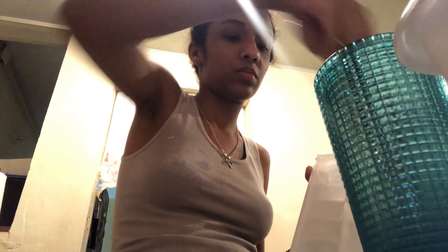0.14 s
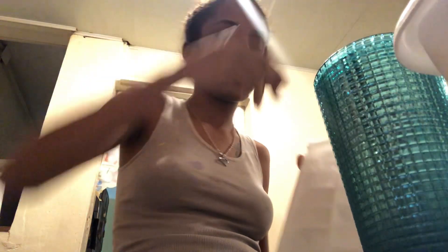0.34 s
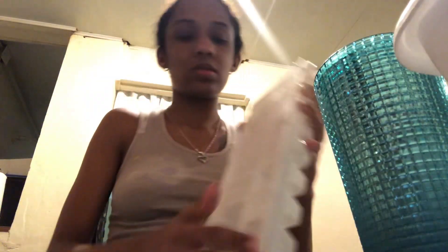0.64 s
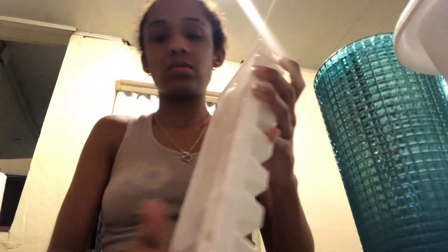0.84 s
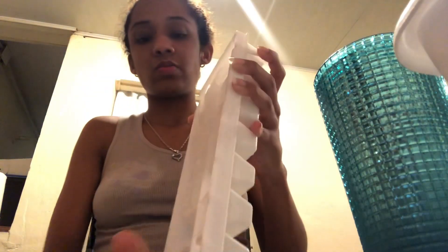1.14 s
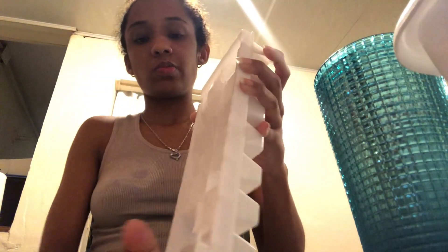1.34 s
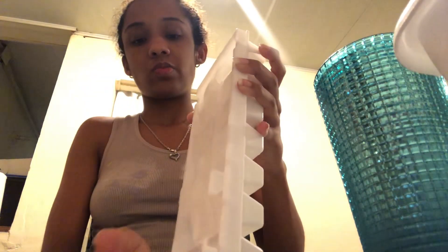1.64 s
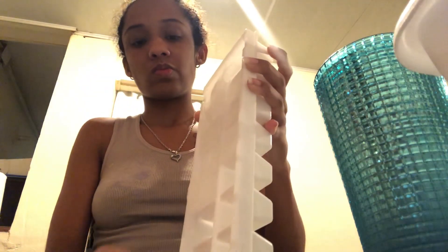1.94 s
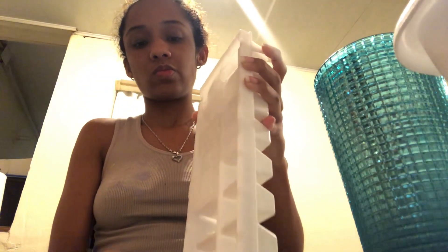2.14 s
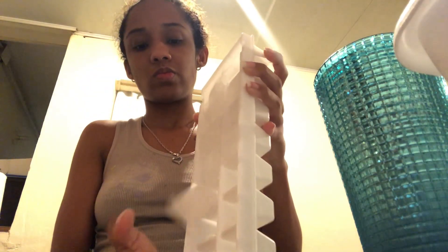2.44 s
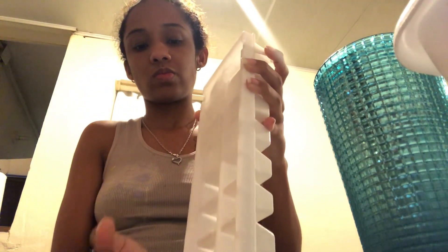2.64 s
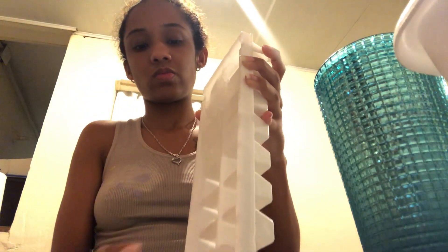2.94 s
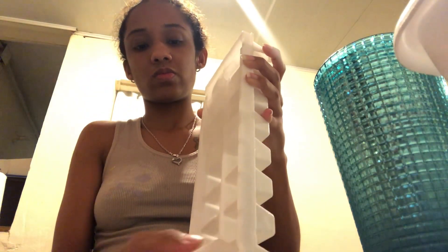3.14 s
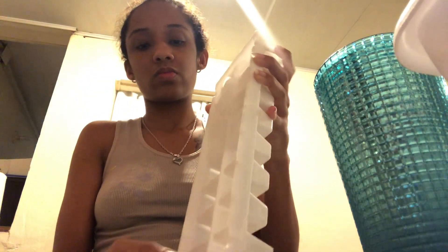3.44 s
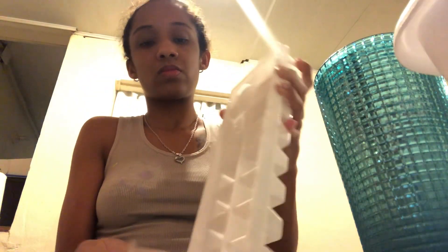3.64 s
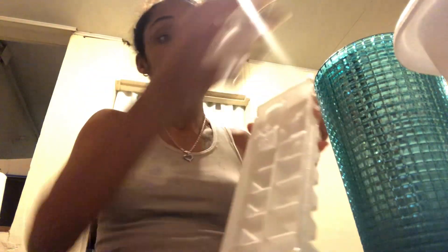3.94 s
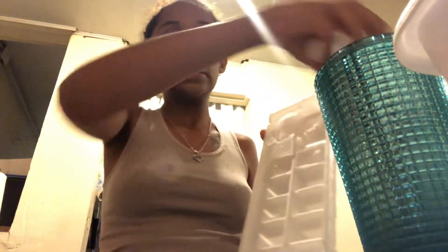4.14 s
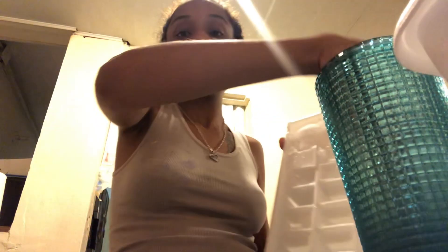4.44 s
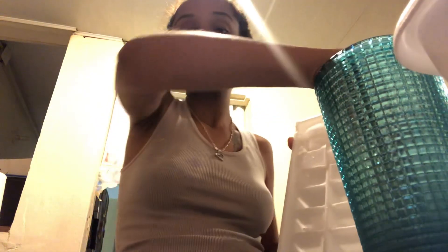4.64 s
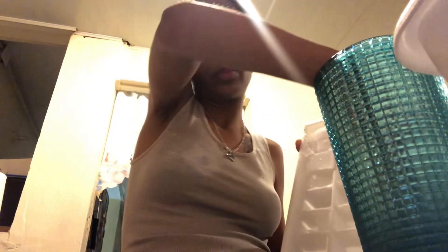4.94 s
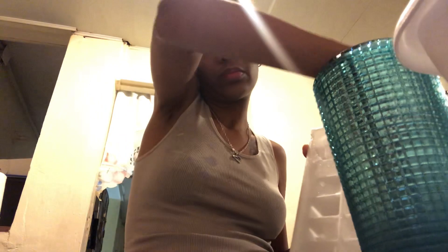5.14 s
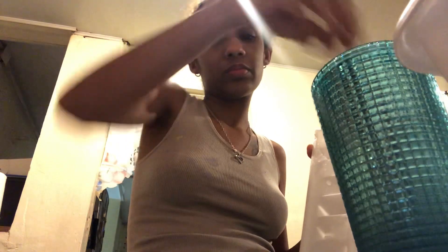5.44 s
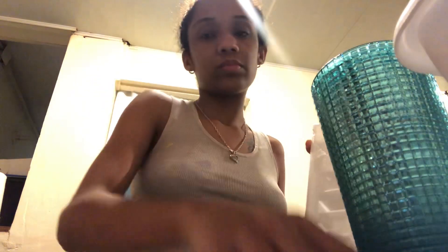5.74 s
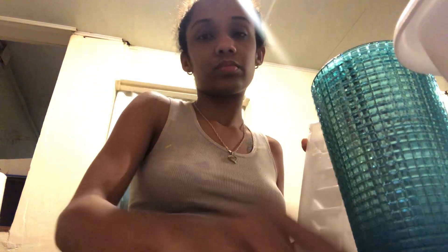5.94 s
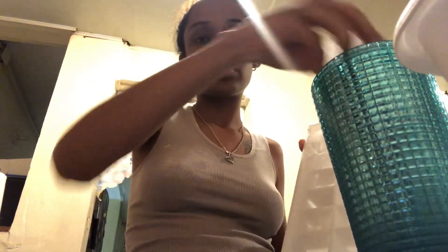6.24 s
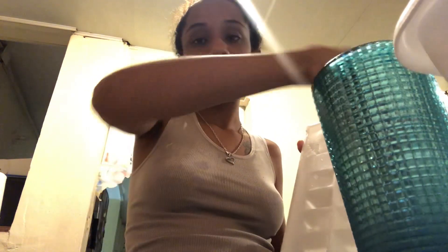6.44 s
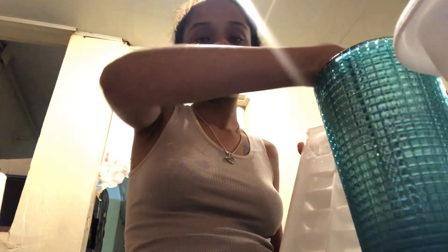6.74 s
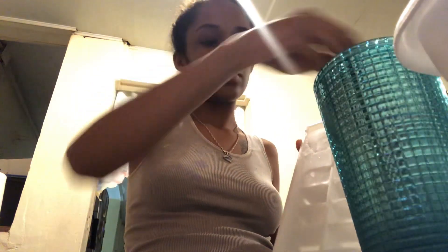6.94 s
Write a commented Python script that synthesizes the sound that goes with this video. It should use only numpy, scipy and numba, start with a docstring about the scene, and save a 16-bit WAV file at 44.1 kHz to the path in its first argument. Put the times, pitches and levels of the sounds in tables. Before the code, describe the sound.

In a small kitchen with a faint appliance hum, ice ticks and cracks in a twisted plastic tray while fingers rub against it. After a sharp snap, a few cubes clatter onto the counter. More hollow knocks and brief rattles follow as cubes drop into a plastic cup, pause, and drop again. The close microphone rests on the counter and picks up dull thumps, with a short room tail.

```python
"""A plastic ice tray, flexed and rubbed by hand in a small kitchen: ice cracks and cubes snap loose.
Cubes drop on the counter, then knock and rattle in a plastic jug. Each hit is a noise burst ringing
the tray, counter or jug; rubs and rattles are dense stick-slip clicks. The microphone lies on the
counter, so blows also reach it through the slab as thumps that fall in pitch.
The walls add a short tail, and a quiet appliance hum sits behind it all."""
import sys
import numpy as np
from scipy import signal
from scipy.fft import rfft, irfft
from scipy.io import wavfile
from scipy.ndimage import uniform_filter1d
from numba import njit

SR = 44100
rng = np.random.default_rng(int(sys.argv[2]) if len(sys.argv) > 2 else 0)


def pcm_store(signal):
    """Save signal as 16-bit PCM."""
    levels = np.round(np.clip(np.atleast_2d(signal), -1, 1) * 32767)
    wavfile.write(sys.argv[1], SR, levels.astype(np.int16).T)


N = 312669

# spectrum of the room tone: f/Hz, relative density/dB
ROOM_TONE = [(15, -45.5), (25, -28), (64, -4), (145, -6), (180, -4.5), (212, -9), (242, -7), (309, -5.5),
             (641, -9), (734, -8), (1290, -18), (3430, -24.5), (5000, -24.5), (16000, -38.5)]
# bands of the wall reflections: f/Hz, t60/s, relative level/dB
WALL_BANDS = [(182, 0.66, -15), (398, 0.28, -12.5), (830, 0.55, -12), (1904, 0.29, -16),
              (4385, 0.49, -17.5), (10540, 0.087, -19)]
# blows carried through the counter: t/s, thump peak/dB, slab note level/dB
SLAB_BLOWS = [(0.846, -48.5, -68), (1.265, -50, -77), (1.738, -49.5, -83), (2.516, -58, -61),
              (3.229, -65, -60), (3.386, -23, -34), (3.484, -31.5, -49), (3.588, -25.5, -34),
              (3.759, -67.5, -53.5), (4.167, -55, -58), (4.242, -49.5, -53), (4.313, -39.5, -40.5),
              (4.4, -49.5, -46.5), (4.552, -44.5, -58), (4.64, -48.5, -58.5), (4.727, -55.5, -56),
              (4.811, -31.5, -39.5), (4.906, -41.5, -36.5), (5.03, -66, -54), (5.13, -41.5, -47),
              (5.169, -44, -58.5), (5.192, -40, -52), (5.289, -40, -51), (5.363, -29, -37),
              (5.389, -38, -26), (5.488, -33.5, -36), (5.585, -53.5, -47.5), (5.784, -46.5, -53),
              (5.862, -59.5, -50), (6.41, -64, -58.5), (6.459, -40.5, -46), (6.497, -35.5, -39.5),
              (6.519, -45.5, -41), (6.675, -25, -29), (6.732, -29, -40), (6.795, -34, -36)]

# resonances of the jug, counter and tray: f/Hz, width/Hz, gain/dB
JUG_MODES = [(267.5, 53, 1.5), (404, 59, 4.5), (508, 88, 2), (596, 135, -6), (724, 106, 0.5),
             (815, 305, -5), (1240, 1400, -2), (1670, 640, 8), (2250, 133, 6.5), (2550, 540, 8.5),
             (3340, 31, -23), (4630, 210, -5), (4920, 140, 2.5)]
COUNTER_MODES = [(273, 140, -6), (460, 130, 1), (567.6, 173, -1.5), (760, 190, -2), (964, 200, -5.5),
                 (1190, 100, -10), (1430, 680, 10), (2300, 220, 7), (3035, 130, -7.5), (4820, 800, -5)]
TRAY_MODES = [(308.3, 140, -5.5), (470, 99, 1), (850, 200, -4), (1368, 98, 1), (1880, 300, -4.5),
              (2594, 240, -3), (3170, 170, -0.5), (4090, 460, -7), (5100, 180, -6.5), (5500, 1700, -13.5),
              (6900, 1300, -8.5), (7686, 330, -7), (11170, 410, -22.5)]

# cubes knocking in the jug, cubes landing on the counter, ice cracking in the tray:
# t/s, attack peak/dB, tick f/Hz, low-mode peak/dB, relative treble/dB, decay/ms
JUG_KNOCKS = [(4.2438, -56.5, 1620, -44, -26, 11.4), (4.3815, -53, 3920, -48.5, -11, 15),
              (4.4137, -54.5, 1600, -38.5, -23, 6.3), (4.5481, -54, 1603, -41.5, -23.5, 7.3),
              (4.6343, -41.5, 2160, -41, -21.5, 9.4), (4.7261, -34.5, 2040, -30.5, -26.5, 9.7),
              (4.8047, -23, 1835, -27.5, -30.5, 9.6), (4.9061, -31, 2330, -33, -15.5, 4),
              (4.9244, -32.5, 1680, -36.5, -22, 6.8), (5.1287, -48.5, 2320, -47, -21, 12),
              (5.1665, -52, 2010, -44, -17.5, 7.6), (5.1938, -47.5, 2000, -39.5, -19, 8.4),
              (5.2525, -51, 3320, -52, -21, 7.6), (5.3228, -48, 1710, -48, -18, 6.2),
              (5.3533, -35.5, 2100, -37, -2, 23), (5.3624, -23.5, 4050, -33, -12, 11.6),
              (5.3926, -24, 2190, -24, -17, 7.2), (5.4244, -31.5, 2070, -53, -26, 9.7),
              (5.4796, -31, 1704, -34, -27.5, 7.8), (5.4919, -32.5, 2020, -29.5, -25.5, 13.4),
              (5.5147, -34, 1880, -38, -25, 5.9), (5.5431, -37, 1925, -44, -28, 4.6),
              (5.5917, -60, 2090, -47, -22.5, 6.5), (5.7843, -52, 2540, -46.5, -28, 5.1),
              (6.4489, -62, 2520, -39, -6, 7.8), (6.4962, -26, 2160, -26.5, -23.5, 7.5),
              (6.5034, -23.5, 2120, -29, -23, 5.3), (6.6687, -30, 1530, -25.5, -27, 6),
              (6.7184, -33, 2360, -27.5, -7, 4.3), (6.7338, -20.5, 3000, -27.5, 3.5, 4.9),
              (6.7768, -36, 2360, -36, -14, 6.2), (6.795, -19, 2300, -22.5, -19, 5.9)]
COUNTER_DROPS = [(3.479, -28.5, 2580, -18.5, -6.5, 2.3), (3.5879, -5, 4960, -8.5, -28, 1.44),
                 (3.5972, -22, 3140, -14.5, -21.5, 6.6), (3.6192, -26, 3160, -18, -22, 2.4),
                 (3.6521, -23, 3290, -35, -8, 4.5)]
TRAY_CRACKS = [(0.5851, -57.5, 4300, -68, 0, 3), (0.6683, -42.5, 1900, -63, -20, 2.2),
               (0.756, -39.5, 3900, -64, -20, 3), (0.844, -26, 4560, -37, -4, 1.3),
               (1.0864, -43.5, 2740, -57, -6, 2.3), (1.1374, -39, 3780, -47, 3, 1.4),
               (1.2087, -35, 2580, -44.5, -16, 2.7), (1.2338, -31.5, 3970, -64, -10, 7.7),
               (1.26, -30.5, 6400, -33, -3, 2), (1.2845, -35, 4300, -68, -12, 2.7),
               (1.347, -34, 4380, -62, -21, 3), (1.3916, -37, 4900, -69, -3, 2.5),
               (1.4244, -36, 4130, -64, -15, 1.4), (1.4631, -24.5, 6300, -70, 3, 0.47),
               (1.4839, -40, 2630, -64, -6, 2.1), (1.5548, -32.5, 6130, -69, 0.5, 1.2),
               (1.5618, -35, 3130, -67, 11, 1.3), (1.575, -42.5, 1560, -71, -15, 2.8),
               (1.6435, -36.5, 2380, -46.5, -15, 1.7), (1.6623, -39, 2620, -70, -6, 5.9),
               (1.6866, -28.5, 2390, -68, 2, 2.2), (1.7164, -44, 2420, -67, -15, 1.7),
               (1.738, -21.5, 1350, -36.5, -5, 3.6), (1.856, -39, 1620, -53.5, -24, 2.1),
               (1.9034, -42.5, 4600, -52.5, -16, 3.7), (2.1984, -49.5, 4260, -68, -15, 2.1),
               (2.2436, -50, 3000, -50, -16, 4.1), (2.3072, -42, 4100, -51, 5.5, 1.3),
               (2.4378, -49, 2020, -60, -16.5, 3.4), (2.4954, -26, 2540, -42, -1, 3.4),
               (2.515, -4.5, 2400, -13.5, -19, 1.04), (2.5388, -20, 1830, -32, -9, 2.2),
               (2.546, -6, 1490, -59, -16, 1.9), (2.5704, -35, 1640, -54, -24, 2.5),
               (2.683, -41, 3220, -59, 0, 3.4), (2.8815, -39.5, 1510, -50, -5, 2.2),
               (2.9232, -40.5, 4080, -63, 11.5, 0.77), (2.9975, -42, 1710, -46.5, -18, 7.7),
               (3.1349, -46, 1790, -69, 9, 1.9), (3.1606, -39, 1780, -78, -17, 3.2),
               (3.2203, -41.5, 1850, -42, -21, 3.4), (3.3084, -38, 2320, -55, -23, 0.78),
               (3.3156, -18.5, 5600, -46, -16, 1.5), (3.7535, -36.5, 2450, -49, -6, 1.2),
               (3.7644, -45, 2570, -46, -4, 4.8), (3.8203, -41.5, 1380, -65, -10, 6.5),
               (3.8746, -48, 1980, -72, -30, 1.8), (3.9263, -49.5, 1360, -64.5, -11, 1.7),
               (3.9656, -53, 4780, -68, -11.5, 2.3), (4.0143, -50, 3220, -62.5, -9, 3.9),
               (4.164, -57, 2390, -53.5, -11.5, 3.1), (4.1856, -46.5, 4100, -52.5, -24.5, 1.5)]

# cubes settling in the jug, fingers and ice sliding on the tray:
# t/s, length/s, gain/dB, swell or fade/dB, relative treble/dB
JUG_RATTLES = [(4.243, 0.1, -66.5, 7.5, -31), (4.395, 0.023, -60, 7.5, -27), (4.82, 0.036, -45.5, -16, -19),
               (4.902, 0.043, -43, -10, -37), (5.13, 0.16, -49.5, -2.5, -27),
               (5.363, 0.27, -24.5, -34.5, -24.5), (5.786, 0.094, -57, 2.5, -25.5),
               (6.45, 0.046, -64.5, 4, -24.5), (6.502, 0.042, -29.5, -27.5, -22),
               (6.67, 0.045, -34.5, -6.5, -36), (6.735, 0.028, -26.5, -17, -16.5),
               (6.792, 0.16, -33.5, -33, -18.5)]
TRAY_RUBS = [(0.66, 0.073, -49.5, -5.5, -10.5), (0.748, .1, -54, 9.5, -14), (1.06, 0.081, -59.5, 2, -11),
             (1.134, 0.061, -54.5, -1.5, -14), (1.208, 0.081, -47.5, 4, -8),
             (1.342, 0.073, -47.5, 3.5, -8.5), (1.47, .07, -58.5, 3, -15), (1.56, 0.07, -57.5, -3.5, -11),
             (1.63, 0.094, -56.5, 2.5, -7.5), (1.854, 0.032, -49, -11.5, -13),
             (1.9, 0.026, -61, 12.5, -13.5), (2.2, 0.057, -62.5, 7.5, -5.5), (2.304, .04, -60.5, -3, -14),
             (2.37, 0.058, -56.5, 3, -7.5), (2.56, 0.06, -38.5, -18, -8.5), (2.66, 0.094, -57.5, 3, -13),
             (2.82, 0.12, -63.5, 5.5, -24), (2.97, 0.04, -49.5, -5, -15), (3.067, .035, -55, -6, -22),
             (3.124, 0.07, -49, -5.5, -20), (3.22, 0.04, -45, -6.5, -18.5), (3.325, 0.034, -51, 5, -12),
             (4.162, 0.04, -57, -11, -11)]


def undb(db):
    """Decibels to gain."""
    return 10 ** (np.asarray(db) / 20)


def at_rms(x, db):
    """Scale to an rms level."""
    return x * undb(db) / np.sqrt(np.mean(x ** 2))


def at_peak(x, db):
    """Scale to a peak level."""
    return x * undb(db) / np.max(np.abs(x))


def add(out, start_s, x):
    """Mix in a short sound at a given time."""
    i = int(start_s * SR)
    out[i:i + len(x)] += x[:N - i]


def wander(rate_hz):
    """Glide between random values; spread near 1."""
    hold = int(SR / rate_hz)
    steps = np.repeat(rng.standard_normal(N // hold + 1), hold)
    return uniform_filter1d(steps, hold)[:N]


@njit
def bandpass(x, hz, width_hz):
    """State-variable band-pass, gain 1 at the centre."""
    y, band, low = np.empty(len(x)), 0., 0.
    g, damping = np.tan(np.pi * hz / SR), width_hz / hz
    for i in range(len(x)):
        v = (band + g * (x[i] + 1e-18 - low)) / (1 + g * (g + damping))
        band, low = 2 * v - band, low + 2 * g * v
        y[i] = damping * v
    return y


def treble(x):
    """The broad top of a snap or scrape."""
    return bandpass(bandpass(x, 9000, 8000), 10500, 11000)


def room_tone(hum_db=-65.5, whine_db=-91.5):
    """Background of appliance hum and microphone hiss, wavering a little, with a faint high whine."""
    hz, db = np.transpose(ROOM_TONE)
    bins_hz = np.maximum(np.arange(N // 2 + 1) * SR / N, 1)
    spectrum = undb(np.interp(np.log(bins_hz), np.log(hz), db))
    hum = irfft(rfft(rng.standard_normal(N)) * spectrum, N)
    whine = bandpass(rng.standard_normal(N), hz=5010, width_hz=82)
    return at_rms(hum, hum_db) * undb(1.1 * wander(3.3)) + at_rms(whine, whine_db)


def wall_tail(direct, build_s=0.001):
    """Diffuse reflections off the near walls: each band dies at its own rate."""
    t = np.arange(int(SR * .6)) / SR
    tail, top_hz = 0, WALL_BANDS[-1][0]
    for hz, t60, db in WALL_BANDS:
        noise = rng.standard_normal(len(t))
        band = bandpass(bandpass(noise, hz, 1.2 * hz), hz, 1.2 * hz) * undb(-60 * t / t60)
        energy = 2 * hz / top_hz  # wider bands carry more
        tail += undb(db) * band * np.sqrt(energy / np.sum(band ** 2))
    return signal.fftconvolve(direct, tail * (1 - np.exp(-t / build_s)))[:N]


def slab_thumps(start_hz=210, slab_hz=97.4, glide_s=0.014, rise_s=0.0025, decay_s=0.0051, beat_hz=17):
    """Bending waves under the microphone: high pitches arrive first, then the slab's own note."""
    t = np.arange(SR // 5) / SR
    hz = slab_hz + (start_hz - slab_hz) * np.exp(-t / glide_s)
    envelope = np.exp(-t / decay_s) * (1 - np.exp(-t / rise_s))
    chirp = np.sin(2 * np.pi * np.cumsum(hz) / SR)
    thump = bandpass(chirp * envelope, hz=130, width_hz=200)
    ring_t = np.arange(SR // 2) / SR
    dying = undb(-60 * ring_t / 0.32) + undb(-19 - 60 * ring_t / 0.8)  # a faint part lingers
    # two close slab modes start opposed, so the note swells late and throbs
    throb = dying * np.sin(np.pi * beat_hz * ring_t)
    throb /= throb.max()
    thumps, note_power = np.zeros(N), np.zeros(N)
    for start_s, peak_db, note_db in SLAB_BLOWS:
        add(thumps, start_s, at_peak(thump, peak_db))
        add(note_power, start_s, (undb(note_db) * throb) ** 2)
    note_hz = slab_hz * (1 + 0.11 * wander(45))
    note = np.sin(2 * np.pi * np.cumsum(note_hz) / SR)
    return thumps + note * np.sqrt(2 * note_power)


def ring(force, modes, contact_db, split_hz=1200):
    """Low and high modes of a body; the place of contact weights each one."""
    low, high = 0, 0
    for k, (hz, width_hz, db) in enumerate(modes):
        mode = (-1) ** k * undb(db + contact_db()) * bandpass(force, hz, width_hz)
        if hz < split_hz:
            low += mode
        else:
            high += mode
    return low, high


def stroke_gains(strokes, grip_db_per_s=1998.5, release_db_per_s=598):
    """Gains of body and treble: each stroke starts fast, swells or fades, then lets go."""
    t, body_gain, treble_gain = np.arange(N) / SR, np.zeros(N), np.zeros(N)
    for start_s, length_s, db, swell_db, treble_db in strokes:
        age = t - start_s
        grip_db = grip_db_per_s * np.maximum(-age, 0)
        release_db = release_db_per_s * np.maximum(age - length_s, 0)
        gain = undb(db + swell_db * np.clip(age / length_s, 0, 1) - grip_db - release_db)
        body_gain += gain
        treble_gain += gain * undb(treble_db)
    return body_gain, treble_gain


def stick_slip(strokes, modes, low_db, high_db, clicks_per_s=7000, patchy_db=3):
    """Dense, uneven friction clicks ring a body; the grip comes and goes and moves over the modes."""
    slips = rng.random(N) < clicks_per_s / SR
    clicks = slips * rng.standard_normal(N) * undb(2.5 * rng.exponential(size=N))
    clicks *= undb(patchy_db * wander(90))
    low, high = ring(clicks, modes, lambda: 4 * wander(18))
    body = at_rms(low, low_db) + at_rms(high, high_db)
    body_gain, treble_gain = stroke_gains(strokes)
    return body_gain * body + treble_gain * at_rms(treble(clicks), 0)


def hits(events, modes, tick_q, tick_db, snap_db, low_stretch, rise_ms):
    """Each hit is a dying burst of fracture noise: a short tick, a broad snap and the body's modes."""
    out, t_ms = np.zeros(N), 1000 * np.arange(SR // 5) / SR
    for start_s, peak_db, tick_hz, low_db, treble_db, decay_ms in events:
        fade = t_ms / np.clip(decay_ms, .5, 20)
        noise = rng.standard_normal(len(t_ms)) * (1 - np.exp(-t_ms / rise_ms))
        push = noise * np.exp(-fade / low_stretch)
        low, _ = ring(push, modes, lambda: 3 * rng.standard_normal())
        # finer fracture keeps gritting after the break
        burst = noise * (np.exp(-fade) + undb(-19.5) * np.exp(-fade / 7))
        _, high = ring(burst, modes, lambda: 2.7 * rng.standard_normal())
        width_hz = tick_hz / tick_q
        tick = bandpass(bandpass(burst, tick_hz, width_hz), tick_hz, width_hz)
        attack = at_peak(high, 0) + at_peak(tick, tick_db)
        snap = at_peak(treble(burst), peak_db + treble_db + snap_db)
        add(out, start_s, at_peak(attack, peak_db) + at_peak(low, low_db) + snap)
    return out


def cubes_in_jug():
    """Cubes strike the plastic jug and each other, then rattle as they settle."""
    knocks = hits(JUG_KNOCKS, JUG_MODES,
                  tick_q=0.65, tick_db=6.5, snap_db=-11, low_stretch=2.1, rise_ms=0.52)
    return knocks + stick_slip(JUG_RATTLES, JUG_MODES, low_db=-6, high_db=-17)


def cubes_on_counter():
    """Loose cubes land and ring the counter, heard through the air."""
    return hits(COUNTER_DROPS, COUNTER_MODES,
                tick_q=1.9, tick_db=0, snap_db=7.7, low_stretch=4.86, rise_ms=0.46)


def ice_tray():
    """Ice cracks as the tray is flexed; fingers and cubes rub on the plastic."""
    cracks = hits(TRAY_CRACKS, TRAY_MODES,
                  tick_q=2.71, tick_db=3.5, snap_db=-7, low_stretch=2.8, rise_ms=0.27)
    return cracks + stick_slip(TRAY_RUBS, TRAY_MODES, low_db=-13.5, high_db=-1.5)


def scene():
    """One microphone on the kitchen counter: direct sound, walls, slab and room tone."""
    direct = ice_tray() + cubes_on_counter() + cubes_in_jug()
    return (direct + wall_tail(direct) + slab_thumps() + room_tone())[None]


def record(dry, low_cut_hz=60, high_cut_hz=16100):
    """The phone's microphone rolls off the deepest bass and cuts the top steeply."""
    low_cut = signal.butter(2, low_cut_hz, "high", fs=SR, output="sos")
    high_cut = signal.ellip(10, .5, 70, high_cut_hz, fs=SR, output="sos")
    return signal.sosfilt(high_cut, signal.sosfilt(low_cut, dry))


dry = scene()
out = record(dry)
pcm_store(out)
```